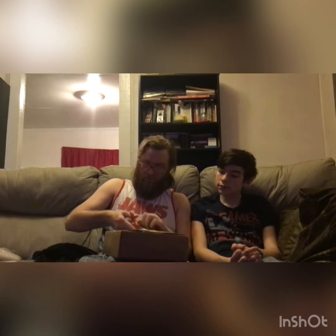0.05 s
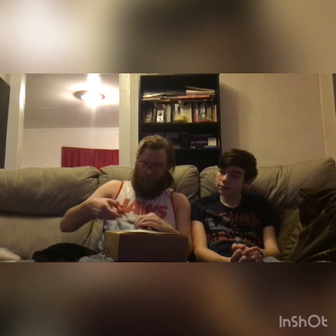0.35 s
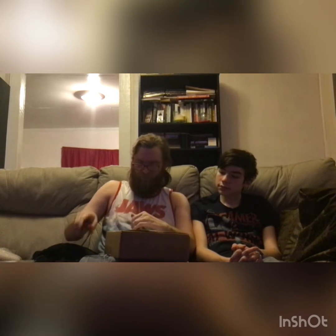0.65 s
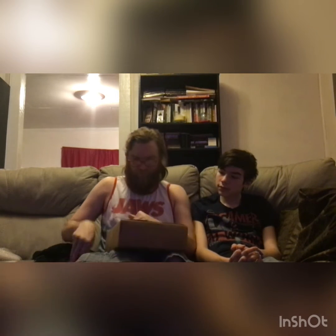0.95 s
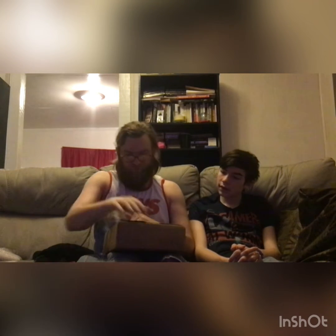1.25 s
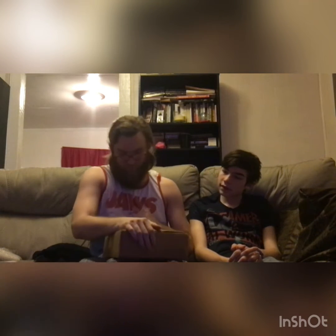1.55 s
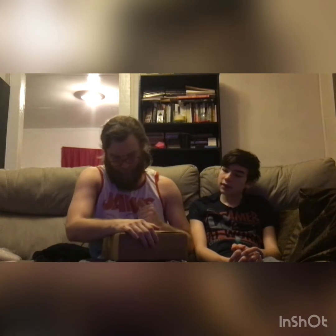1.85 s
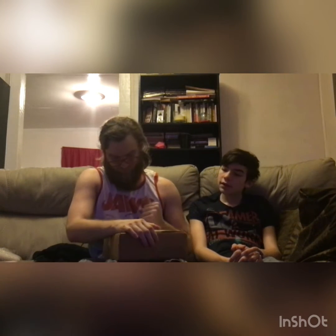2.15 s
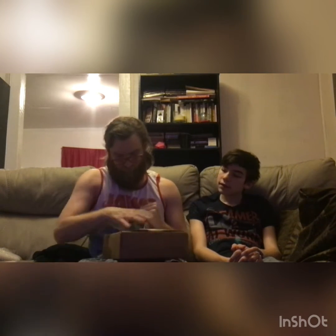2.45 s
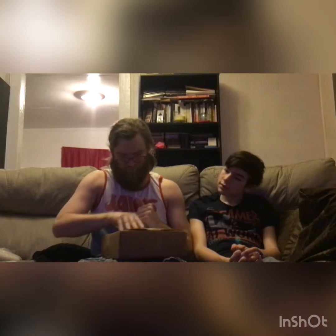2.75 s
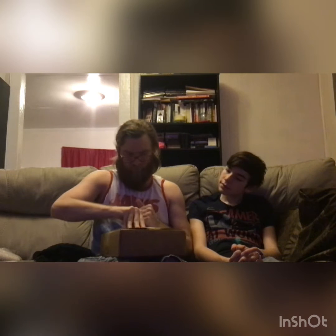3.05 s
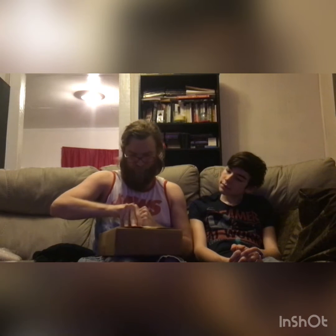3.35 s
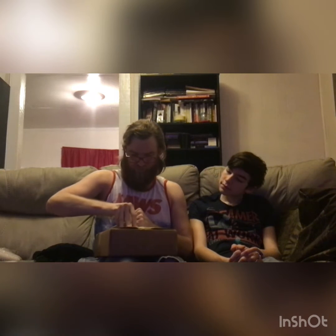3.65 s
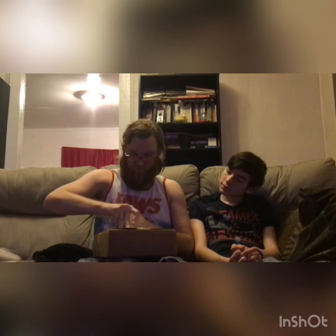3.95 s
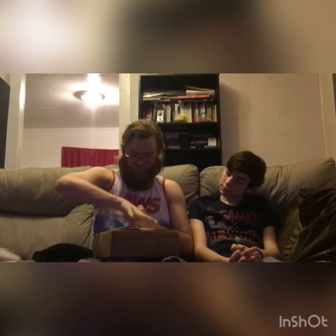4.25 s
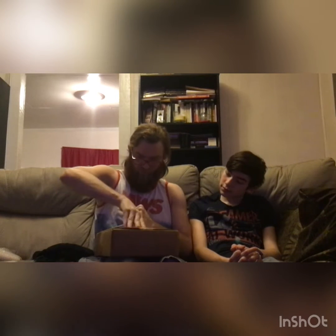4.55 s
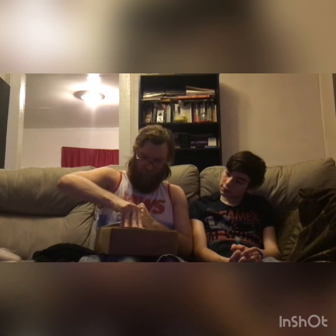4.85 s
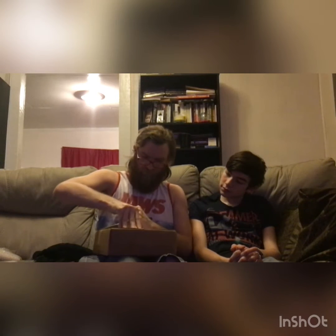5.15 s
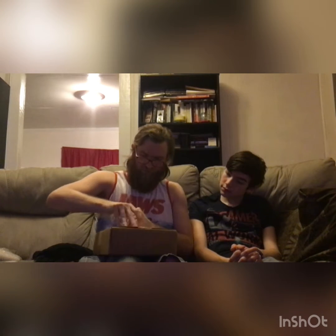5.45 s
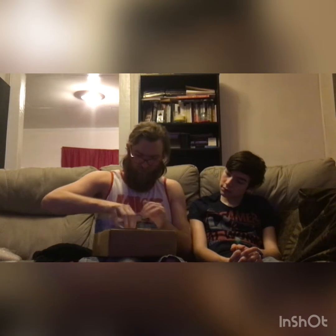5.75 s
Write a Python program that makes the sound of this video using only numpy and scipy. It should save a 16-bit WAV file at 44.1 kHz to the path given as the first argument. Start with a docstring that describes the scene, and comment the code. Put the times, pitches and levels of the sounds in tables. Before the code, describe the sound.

Fingers work at the taped lid of a cardboard box, a couple of metres from the microphone in a furnished living room. Faint hiss and hum lie underneath, and the room gives each sound a brief echo. For the first second, skin slides softly over the card, with light fingertip taps and small dull bumps. At about 1.4 seconds the box bumps and a nail picks at the tape, giving one loud, sharp crack. A short scratch and a firm rub follow around 2 seconds, then a soft bump near 2.8. At 3 seconds comes a cluster of scratches and small snaps, followed by a run of light taps and gentle rubbing. A second loud crack comes at about 4.9 seconds. Firmer taps follow between 5.1 and 5.5 seconds, and a few short strokes over the card end it just before 6 seconds.

```python
"""Fingers work at the taped lid of a cardboard box, a couple of metres off in a furnished living room.
Over faint hiss and hum, skin slides on the card, fingertips tap the lid and the box bumps softly.
From 1.4 s nails scratch and snap at the tape, with one loud crack; a firm rub follows near 2 s.
More scratches and snaps near 3 s, then a run of light taps and a second loud crack at 4.9 s.
Firmer taps and a few short strokes end it. The room answers briefly throughout."""
import sys
import numpy as np
from scipy import signal
from scipy.fft import rfft, irfft
from scipy.io import wavfile

SR = 44100
rng = np.random.default_rng(int(sys.argv[2]) if len(sys.argv) > 2 else 0)


def pcm_store(signal):
    """Save signal as 16-bit PCM."""
    levels = np.round(np.clip(np.atleast_2d(signal), -1, 1) * 32767)
    wavfile.write(sys.argv[1], SR, levels.astype(np.int16).T)


N = 259749

# Table levels are relative: each source adds its own gain.
# room noise spectrum: f/Hz, level/dB
AIR_SPECTRUM = [(24, -39), (40, -6), (114, 4.5), (304, -5.5), (362, 2), (476, -12.5), (553, -4),
                (1170, -18.5), (1790, -19), (3440, -19.5), (7460, -29), (15800, -35.5)]
# hand strokes over the card: t/s, length/s, hiss level/dB, lid drive/dB
STROKES = [(0.02, 0.33, -55.5, -56), (0.477, 0.18, -61, -65.5), (0.734, 0.36, -66, -68),
           (1.338, 0.44, -58.5, -63.5), (1.716, 0.26, -53.5, -54.5), (1.854, 0.056, -45, -44),
           (1.958, 0.32, -49, -51), (2.148, 0.074, -54, -54.5), (2.208, 0.22, -60, -82),
           (2.548, 0.44, -65.5, -62), (3.197, 0.68, -59, -61), (4.066, 0.2, -62.5, -56.5),
           (4.292, 0.5, -65.5, -63.5), (4.592, 0.17, -61.5, -67), (4.771, 0.7, -64.5, -71),
           (5.446, 0.21, -62, -56), (5.656, 0.12, -60, -59), (5.833, 0.08, -62, -66)]
# surface friction spectrum: f/Hz, level/dB
HISS_SPECTRUM = [(100, -11), (500, -0.5), (1100, -17.5), (1900, -2.5), (2800, -5.5), (4500, -0.5),
                 (6200, 2.5), (7900, 4.5), (9200, -4), (12000, -17.5), (16000, -31.5)]
# drive of sliding skin on the lid: f/Hz, level/dB
FLEX_SPECTRUM = [(50, -28), (110, -1.5), (400, -0.5), (700, -6), (1100, -4), (2000, -4), (4000, -7),
                 (12000, -24)]
# resonances of the free lid: f/Hz, width/Hz, level/dB
FREE_LID_MODES = [(212, 140, -6), (411, 85, -5.5), (546, 36, -8.5), (652, 220, -5), (1348, 89, -8.5),
                  (1726, 143, -8.5)]
# resonances of the lid under a flat hand: f/Hz, width/Hz, level/dB
HELD_LID_MODES = [(233, 38, -2.5), (394.2, 12, 15.5), (424, 21, -3.5), (540, 23, -14), (650, 65, 1),
                  (1900, 180, -7)]
# fingertips land on the lid: t/s, level/dB
TAPS = [(0.089, -41.5), (0.283, -51), (0.743, -56), (1.406, -39), (1.82, -39), (1.881, -51), (2.568, -52),
        (2.995, -49), (3.074, -35), (3.27, -47), (3.341, -49), (3.459, -47), (3.533, -47.5), (3.626, -47.5),
        (3.717, -44.5), (4.035, -46.5), (4.131, -43), (4.33, -46), (4.375, -50), (4.785, -46),
        (4.866, -32.5), (5.049, -48.5), (5.164, -36), (5.244, -36.5), (5.351, -35.5), (5.515, -41)]
# drive of a fingertip on the lid: f/Hz, level/dB
FINGERTIP_SPECTRUM = [(50, -42), (150, -1), (300, -2), (700, 3), (1050, 3), (1500, 12), (2200, 9.5),
                      (4000, 2.5), (12000, -4.5)]
# bumps of the whole box: t/s, level/dB, f/Hz
BUMPS = [(0.172, -51.5, 143), (0.408, -53.5, 144), (1.412, -36.5, 160), (1.424, -40.5, 244),
         (1.463, -48, 69), (2.772, -40, 153), (4.074, -49, 162), (5.055, -60, 166)]
# tape and nail snap free: t/s, level/dB, centre f/Hz, width/oct, tearing time/s, room send/dB
SNAPS = [(1.37, -44, 6340, 0.9, 0.00078, 3.5), (1.406, -40.5, 7140, 0.89, .001, -16),
         (1.4608, -13, 5570, 0.46, 0.000083, -5.5), (1.8191, -41.5, 6500, .8, .001, 7),
         (2.99, -37, 7200, 0.31, .0006, -3), (3.0109, -25.5, 6650, 0.42, 0.0017, -4.5),
         (3.0187, -29, 6760, .4, .0014, -14), (3.0676, -34.5, 7250, .5, 0.0016, 9.5),
         (3.4659, -33, 6800, 0.46, 0.0012, .5), (3.7626, -46, 7180, 0.48, 0.00068, 9),
         (4.78, -43, 3340, 0.7, 0.00081, 2), (4.8685, -12, 4900, .65, 0.00014, 1),
         (5.037, -46.5, 7060, .7, 0.0011, 9), (5.086, -42, 6700, 0.69, .001, 6.5),
         (5.584, -42.5, 5760, 0.82, .001, 2.5)]
# spectrum of a snap: f/Hz, level/dB
CRACK_SPECTRUM = [(100, -32), (330, -35), (600, -11), (1100, -6), (1700, 1), (2400, -0.5), (4400, 0),
                  (8000, -2), (9500, -8.5), (12000, -14.5), (16000, -54)]
# a nail drags on tape or card: t/s, length/s, level/dB, centre f/Hz, width/oct, lid drive/dB
SCRATCHES = [(1.394, 0.019, -47, 4950, 2, -49.5), (1.813, 0.015, -41, 6100, 3.9, -48),
             (2.61, 0.197, -84, 1510, 0.3, -60), (2.952, 0.03, -55, 7000, 0.24, -65),
             (2.989, 0.11, -44, 7300, 0.16, -58.5), (3.066, 0.079, -40.5, 6750, 4.9, -49.5),
             (4.861, 0.016, -37.5, 6620, 1.1, -38.5), (4.938, 0.022, -38, 5200, 1.5, -53.5),
             (5.484, 0.074, -57.5, 4550, 0.37, -59)]
# decay of the room: f/Hz, T60/s
ROOM_DECAY = [(100, 0.38), (500, 0.3), (1500, 0.3), (4500, 0.34), (8000, 0.26), (15000, 0.5)]
# onset of the room tail: f/Hz, build-up/s
ROOM_BUILD_UP = [(150, 0.0043), (500, 0.0025), (2000, 0.00047)]
# echoes off nearby surfaces: delay/s, gain
ECHOES = [(.0029, -0.38), (.0085, 0.19), (0.0137, 0.25)]


def amp(db):
    return 10 ** (np.asarray(db) / 20)


def unit_rms(x):
    return x / np.sqrt(np.mean(x ** 2) + 1e-20)


def curve(points, hz):
    """Linear interpolation over log frequency."""
    f, value = np.transpose(points)
    return np.interp(np.log(hz + 1), np.log(f + 1), value)


def add(mix, start_s, sound):
    part = mix[max(round(start_s * SR), 0):][:len(sound)]
    part += sound[:len(part)]


def bins_hz(size=4096):
    return np.fft.rfftfreq(size, 1 / SR)


def spectrum(points, size=4096):
    return amp(curve(points, bins_hz(size)))


def minimum_phase(gain):
    """Spectrum of a response that starts at once and rings out."""
    log_gain = np.log(np.maximum(gain, 1e-5))
    mirrored = np.concatenate([log_gain, log_gain[-2:0:-1]])
    return np.exp(np.conj(signal.hilbert(mirrored)))[:len(gain)]


def colour(x, gain):
    """Filters x; unit RMS out."""
    return unit_rms(signal.oaconvolve(x, irfft(minimum_phase(gain)))[:len(x)])


def background(air_db=-63.5, hum_hz=60, hum_db=-74):
    """Steady room noise and faint mains hum."""
    air = irfft(rfft(rng.standard_normal(N)) * spectrum(AIR_SPECTRUM, N), N)
    hum = np.sin(2 * np.pi * hum_hz * np.arange(N) / SR)
    return amp(air_db) * unit_rms(air) + amp(hum_db) * unit_rms(hum)


def stroke_levels_db(rest_hiss_db=-72, rest_lid_db=-74.5, speed_up_share=0.3, slow_down_share=0.42):
    """Hiss and lid drive follow hand speed; between strokes the resting hand stirs a little."""
    t = np.arange(N) / SR
    power = amp([[rest_hiss_db], [rest_lid_db]]) ** 2 * np.ones(N)
    for start_s, length_s, hiss_db, lid_db in STROKES:
        progress = (t - start_s) / length_s
        ramp = np.minimum(progress / speed_up_share, (1 - progress) / slow_down_share)
        speed = np.sin(np.pi / 2 * np.clip(ramp, 0, 1))
        power += (amp([[hiss_db], [lid_db]]) * speed) ** 2
    return 10 * np.log10(power)


def friction(slips_per_s, spread_db, smooth_gain, clump_db=0, clump_hz=140, samples=N):
    """Fibres catch and let go: tiny uneven slips over a smooth rub, optionally in clumps."""
    sizes = amp(spread_db * np.minimum(rng.exponential(1, samples), 4))
    signs = rng.choice([-1, 1], samples)
    slips = unit_rms(sizes * signs * (rng.random(samples) < slips_per_s / SR))
    rub = smooth_gain * rng.standard_normal(samples)
    index = np.arange(samples)
    clumps = np.interp(index * clump_hz / SR, index, rng.standard_normal(samples))
    return unit_rms((slips + rub) * amp(clump_db * clumps))


def lid_gain(modes=FREE_LID_MODES):
    """Damped panel resonances over a flat base."""
    power = sum(amp(db) ** 2 / (1 + (2 * (bins_hz() - hz) / width_hz) ** 2) for hz, width_hz, db in modes)
    return np.sqrt(power + 0.04)


def sliding(hiss_gain_db=2, flex_gain_db=1.5, fizz_hz=9000, firm_db=-48, hold_db=-58):
    """Sliding skin hisses and shakes the lid; a firm stroke holds the lid down and adds fizz."""
    surface_db, drive_db = stroke_levels_db()
    slips = friction(slips_per_s=2200, spread_db=3.3, smooth_gain=0.5, clump_db=1.7)
    hiss = colour(slips, spectrum(HISS_SPECTRUM))
    treble = (bins_hz() / fizz_hz) ** 3
    fizz = colour(slips, spectrum(HISS_SPECTRUM) * treble / (1 + treble))
    fizz_gain_db = -4 + 0.69 * (surface_db - firm_db)
    surface = amp(hiss_gain_db) * hiss + amp(fizz_gain_db) * fizz
    free = colour(slips, spectrum(FLEX_SPECTRUM) * lid_gain())
    held = colour(slips, spectrum(FLEX_SPECTRUM) * lid_gain(HELD_LID_MODES))
    hold = 1 / (1 + amp(hold_db - surface_db) ** 2)  # 0 light touch, 1 flat hand
    flex = hold * held + (1 - hold) * free
    return surface * amp(surface_db) + flex * amp(drive_db + flex_gain_db)


def bending_wave(gain, travel_s, reference_hz=500):
    """Treble crosses the card first, so a blow is a quick downward chirp; peak 1."""
    dispersion = np.exp(-4j * np.pi * travel_s * np.sqrt(reference_hz * bins_hz()))
    chirp = irfft(minimum_phase(gain) * dispersion)
    return chirp / abs(chirp).max()


def knock(cutoff_hz):
    """A soft blow on the lid, with little above the cutoff."""
    lowpass = 1 / np.sqrt(1 + (bins_hz() / cutoff_hz) ** 6)
    return bending_wave(spectrum(FINGERTIP_SPECTRUM) * lid_gain() * lowpass, travel_s=0.003132)


def tapping(gain_db=3, firm_db=-28.5, firm_cutoff_hz=850.1, db_per_oct=45.5, lead_s=0.00115):
    """A fingertip rings the lid; the softer the touch, the duller the tap."""
    out = np.zeros(N)
    for start_s, db in TAPS:
        cutoff_hz = firm_cutoff_hz * 2 ** ((db - firm_db) / db_per_oct)
        add(out, start_s - lead_s, amp(db + gain_db) * knock(cutoff_hz))
    return out


def bumping(swing_gain_db=3, swell_s=0.0041, knock_gain_db=-1, lead_s=0.00521):
    """A soft push knocks the lid dully, then the air in the box swings for a few cycles."""
    out, t = np.zeros(N), np.arange(SR // 5) / SR
    envelope = t / swell_s * np.exp(1 - t / swell_s)
    for start_s, db, hz in BUMPS:
        add(out, start_s - lead_s, amp(db + knock_gain_db) * knock(cutoff_hz=330))
        add(out, start_s, amp(db + swing_gain_db) * envelope * np.sin(2 * np.pi * hz * t))
    return out


def contact_gain(centre_hz, width_oct):
    """A spectral hump: the smaller the contact, the higher it lies."""
    return 1 / np.sqrt(1 + (np.log2((bins_hz() + 1) / centre_hz) / width_oct) ** 2)


def snapping(gain_db=4, fibre_db=-14):
    """Brief cracks trailed by breaking fibres; some face the microphone, others the room."""
    direct, send, t = np.zeros(N), np.zeros(N), np.arange(SR // 100) / SR
    for start_s, db, centre_hz, width_oct, tear_s, send_db in SNAPS:
        fibres = amp(fibre_db) * rng.standard_normal(len(t)) * np.exp(-t / tear_s)
        fibres[0] = 1  # main break
        crack_gain = spectrum(CRACK_SPECTRUM) * contact_gain(centre_hz, width_oct) ** 2
        crack = bending_wave(crack_gain, travel_s=0.001544)
        snap = amp(db + gain_db) * np.convolve(crack, fibres)
        add(direct, start_s, snap)
        add(send, start_s, amp(send_db) * snap)
    return direct, send


def scratching(rise_s=0.0015, sag_db=4, release_s=0.005):
    """A nail bites and stutters along, fading as it slows."""
    out, t = np.zeros(N), np.arange(SR // 5) / SR
    for start_s, length_s, db, centre_hz, width_oct, lid_db in SCRATCHES:
        slips = friction(slips_per_s=1500, spread_db=-1.5, smooth_gain=0.26, samples=len(t))
        rasp = colour(slips, spectrum(HISS_SPECTRUM) * contact_gain(centre_hz, width_oct))
        flex = colour(slips, spectrum(FINGERTIP_SPECTRUM) * lid_gain())
        envelope = np.interp(t, [0, rise_s, length_s, length_s + release_s], [0, 1, amp(-sag_db), 0])
        add(out, start_s, envelope * (amp(db) * rasp + amp(lid_db) * flex))
    return out


def room_response(tail_db=2):
    """A few near echoes and a short diffuse tail whose bass gathers late."""
    hz, t, noise = signal.stft(rng.standard_normal(SR // 2), SR, nperseg=256)
    decay = amp(-60 * t / curve(ROOM_DECAY, hz)[:, None])
    onset = 1 - np.exp(-(t / curve(ROOM_BUILD_UP, hz)[:, None]) ** 2)
    response = signal.istft(noise * decay * onset, SR)[1]
    response *= amp(tail_db) / np.linalg.norm(response)
    for delay_s, gain in ECHOES:
        add(response, delay_s, np.array([gain]))
    return response


def room(send, crossfade_hz=9, tails=3):
    """Three room tails crossfade steadily, giving a smooth, even reverberation without ringing tones."""
    phase = 2 * np.pi * crossfade_hz * np.arange(N) / SR
    # squares sum to 1
    shares = [(1 + 2 * np.cos(phase + 2 * np.pi * k / tails)) / tails for k in range(tails)]
    return sum(signal.fftconvolve(send * share, room_response())[:N] for share in shares)


def scene(rub_gain_db=-4, bump_send_db=-7):
    """The lid faces the ceiling, so taps reach the room more strongly than the microphone."""
    rubs = amp(rub_gain_db) * (sliding() + scratching())
    taps, bumps = tapping(), bumping()
    snaps, snap_send = snapping()
    send = rubs + taps + amp(bump_send_db) * bumps + snap_send
    return (rubs + taps + bumps + snaps + room(send) + background())[None]


def record(dry, low_cut_hz=52, high_cut_hz=15850):
    """The small microphone loses the deep bass; a steep low-pass limits the band."""
    highpass = signal.butter(8, low_cut_hz, "highpass", fs=SR, output="sos")
    lowpass = signal.firwin(511, high_cut_hz, window=("kaiser", 9), fs=SR)
    return signal.oaconvolve(signal.sosfilt(highpass, dry), lowpass[None], "same")


dry = scene()
out = record(dry)
pcm_store(out)
```